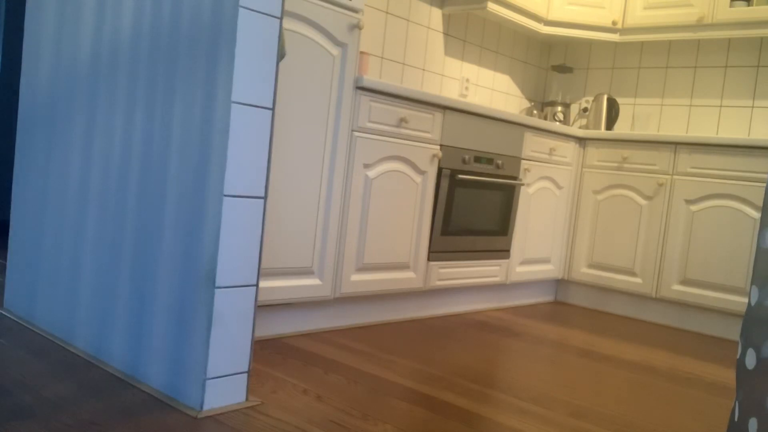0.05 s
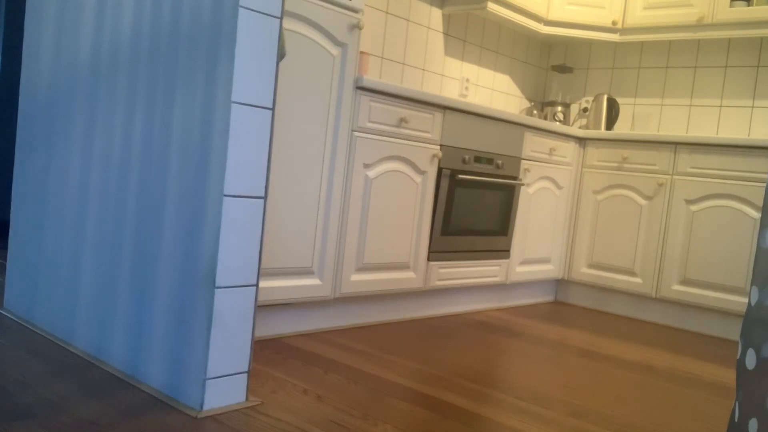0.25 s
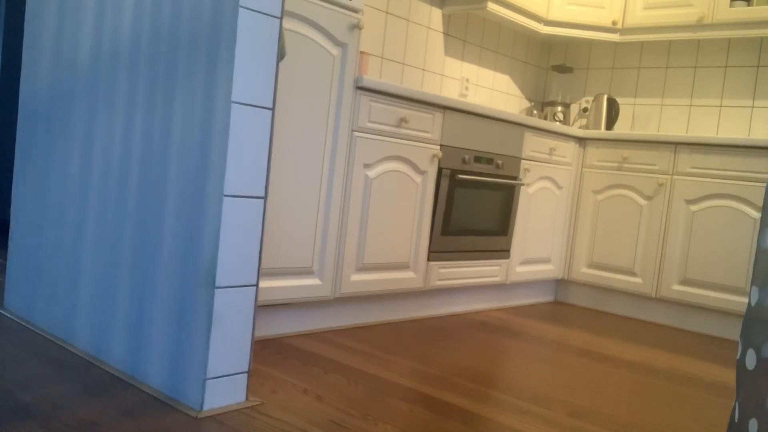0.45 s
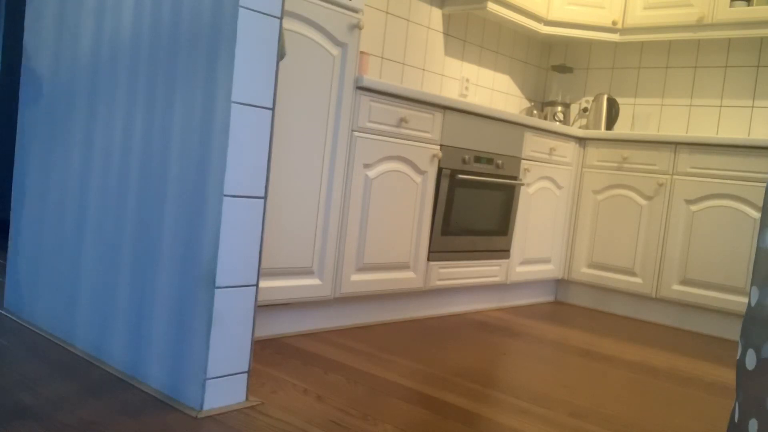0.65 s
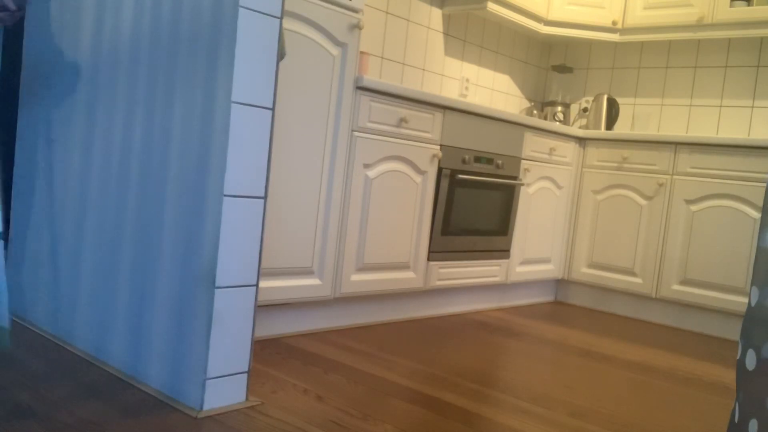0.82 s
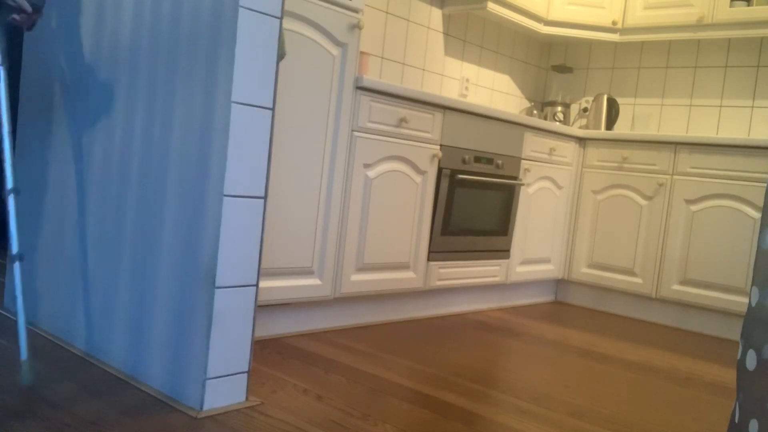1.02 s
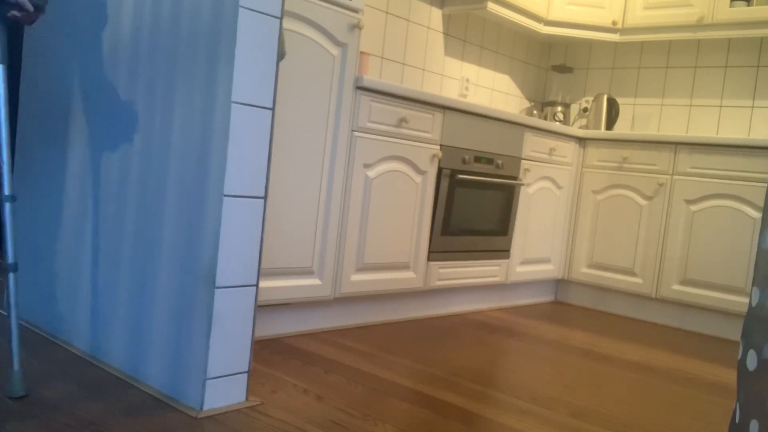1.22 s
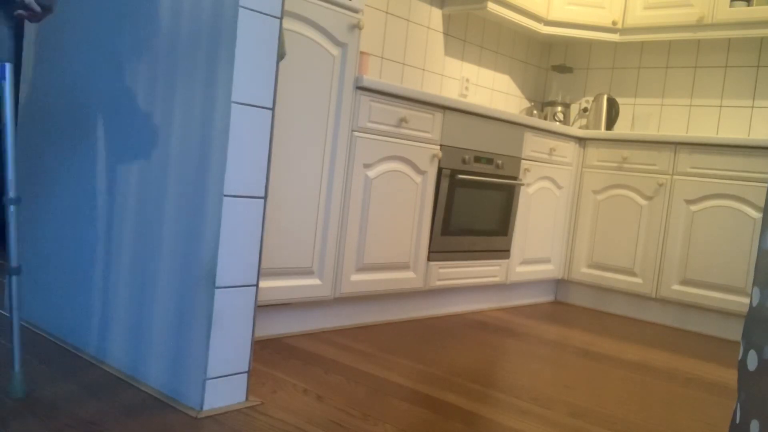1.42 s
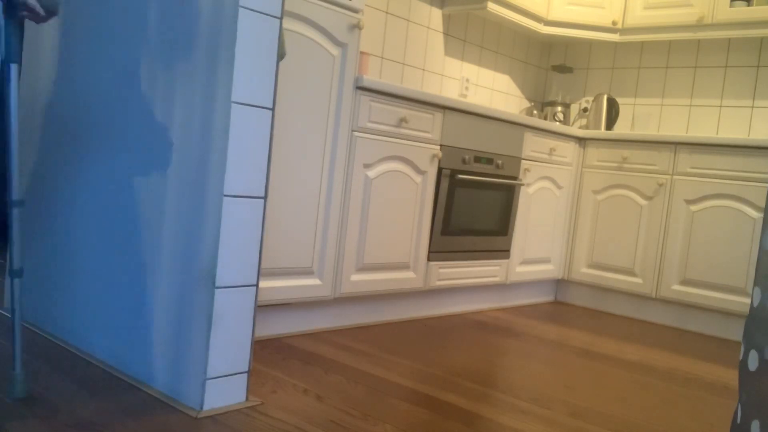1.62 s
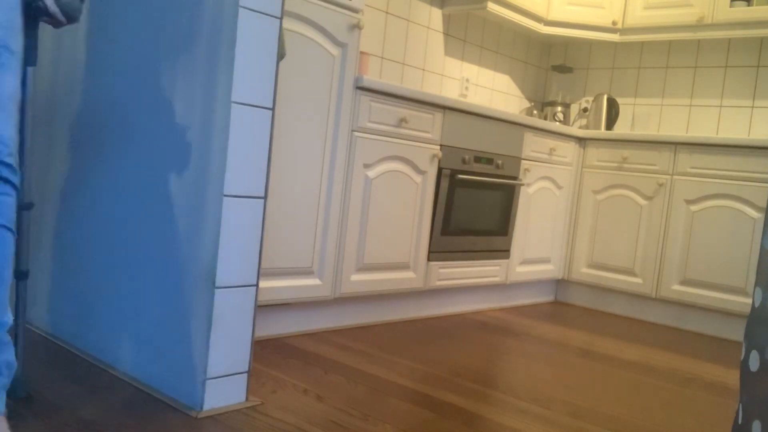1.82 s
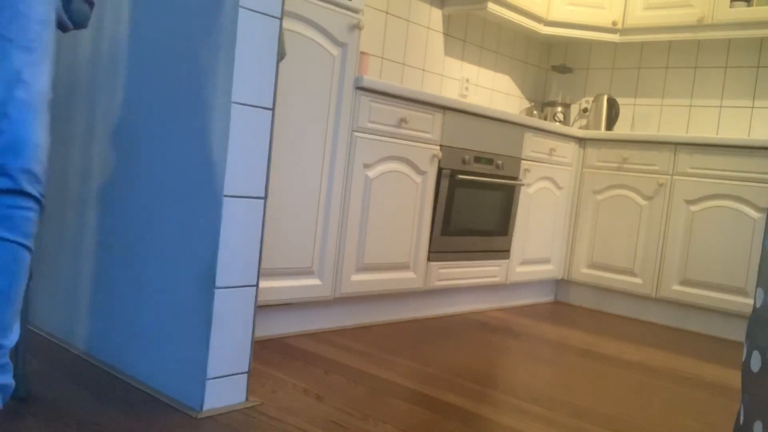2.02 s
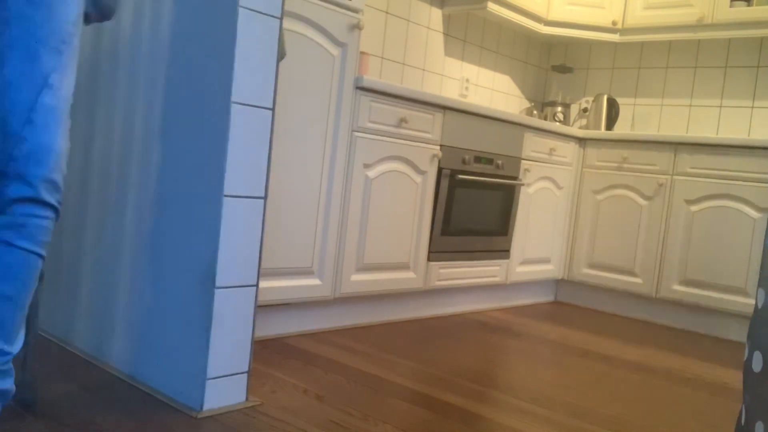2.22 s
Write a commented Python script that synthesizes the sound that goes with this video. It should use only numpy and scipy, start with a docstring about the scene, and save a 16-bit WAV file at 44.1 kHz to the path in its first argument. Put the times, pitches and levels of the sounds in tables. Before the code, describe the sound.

Someone walks on crutches over a hard floor in an echoing kitchen, a few metres away. A scuff and heavy thud come around 0.3 seconds, followed by light metal clacks. Just after 1 second the loudest clacks sound and the floor booms. From 1.7 to 2 seconds rubber tips and a shoe thud and scuff again, with one last clack near 2.2 seconds. A faint low hum continues throughout.

```python
"""Someone on crutches takes two swinging steps over a hard floor into an echoing kitchen.
First an earlier step's echo fades over a low hum that never stops. A scuff and a heavy thud follow,
as rubber tips and a shoe meet the floor, then the loose metal tubes clack. After one second come the
loudest clacks, and the floor booms under the weight. More thuds and scuffs lead to one last clack.
A small stereo microphone hears it all from a few metres away."""
import sys
import numpy as np
from scipy import signal
from scipy.fft import rfft, irfft
from scipy.io import wavfile

SR = 44100
rng = np.random.default_rng(int(sys.argv[2]) if len(sys.argv) > 2 else 0)


def wav_record(signal):
    """Record a signal, one row per channel, as 16-bit PCM in the file named by sys.argv[1]."""
    frames = np.transpose(np.atleast_2d(signal))
    bounded = np.clip(frames, -1, 1)
    # unit amplitude maps onto the largest positive 16-bit level
    quanta = np.round(bounded * 32767).astype(np.int16)
    wavfile.write(sys.argv[1], SR, quanta)


N = 103635
t = np.arange(N) / SR
freq = np.maximum(np.arange(N + 1) * SR / (2 * N), 1)
LEFT_RIGHT = np.array([[1], [-1]])  # plus on the left, minus on the right


def amp(db):
    """Turn decibels into a gain."""
    return 10 ** (np.asarray(db) / 20)


def blow(x):
    """Scale a hit to the energy of 12 ms at level one."""
    return x * np.sqrt(.012 * SR / np.sum(x ** 2))


def through(x, response):
    """Filter a sound with one gain for each frequency."""
    return irfft(rfft(x, 2 * N) * response)[..., :N]


def colour(points):
    """Join points of pitch in Hz and level in dB into a gain for each frequency."""
    hz, db = np.array(points).T
    return amp(np.interp(np.log(freq), np.log(hz), db))


def noise(points):
    """Noise at level one, coloured by such points."""
    x = through(rng.standard_normal(N), colour(points))
    return x / x.std()


def tilt(x, tilt_db):
    """Brighten or dull a sound above 1000 Hz by so many dB per octave."""
    return through(x, amp(tilt_db * np.log2(np.maximum(freq / 1000, 1))))


def band(hz, width):
    """A filter that favours one pitch; its width is a share of that pitch."""
    return 1 / (1 + 1j * (freq / hz - hz / freq) / width)


def fade(t60, rise=1 / SR):
    """Swell, then die away. The fade time t60 is the seconds it takes to fall 60 dB."""
    return amp(-60 * t / t60) * (1 - np.exp(-t / rise))


def add(track, x, at):
    """Mix a sound into a track at a time in seconds."""
    i = int(max(at, 0) * SR)
    track[..., i:] += x[..., :N - i]


def send(x, room_db):
    """Split a sound into its direct part and the part that fills the room."""
    return np.array([x, x * amp(room_db)])


def strike(notes, rise):
    """Set an object's notes ringing, each from a random point in its wave."""
    rings = np.array([amp(db) * fade(t60, rise) * np.exp(2j * np.pi * hz * t) for hz, db, t60 in notes])
    phases = np.exp(2j * np.pi * rng.random(len(notes)))
    return blow((phases @ rings).imag)


def background():
    """Still room air and the wavering hum of an appliance."""
    # The air's colour. Each row: pitch in Hz, level in dB.
    air_colour = [(20, -1), (42, 0), (70, -7), (130, -16.5), (300, -22.5), (1000, -29.5), (3000, -35.5),
                  (8000, -41), (16000, -48)]
    air_db, hum_db, hum_hz = -64.5, -64, 101.5
    waver = 1 + 0.25 * noise([(1, 0), (5, 0), (15, -30), (60, -100)])
    hum = amp(hum_db) * np.sqrt(2) * waver * np.sin(2 * np.pi * hum_hz * t)
    air = noise(air_colour) + 0.5 * noise(air_colour) * LEFT_RIGHT
    return hum + amp(air_db) * air


def earlier_step():
    """The dull echo of an earlier step dies away at the start."""
    # The echo's colour. Each row: pitch in Hz, level in dB.
    echo_colour = [(80, 6), (250, 0.5), (500, -8.5), (1500, -15), (4000, -22.5), (12000, -41)]
    return amp(-63.5) * fade(t60=0.34) * noise(echo_colour)


def kitchen(x):
    """Dense echoes off tiles and cupboards; each range of pitch fades at its own speed."""
    # The room's echo. Each row: pitch in Hz, fade time in seconds, level in dB,
    # how much left and right differ from 0 to 1.
    ranges = [(62.7, 0.98, 9.5, 0), (145, 0.75, 7, .3), (382, 0.58, 2.5, 0.2), (635, 0.63, 3, 0.98),
              (1400, 0.63, 4.5, 1), (3240, 0.61, 5, 0.98), (6000, 0.5, 0.5, 1), (8000, 0.41, 2, 0.1),
              (15000, 0.58, -6, .25)]
    centres = np.log([row[0] for row in ranges])
    mid, side = rfft(rng.standard_normal((2, N)), 2 * N)
    echo = np.zeros((2, N))
    for this_range, (hz, t60, db, apart) in zip(np.eye(len(ranges)), ranges):
        share = np.interp(np.log(freq), centres, this_range)
        tail = fade(t60, rise=0.00057)
        pair = irfft(share * (mid + apart * side * LEFT_RIGHT))[:, :N] / np.hypot(1, apart)
        add(echo, amp(db) * pair * tail / np.linalg.norm(tail), at=.004)
    return through(x, rfft(echo, 2 * N))


def floor_lows():
    """The floor booms on its low notes and rumbles under the walker's weight."""
    # Booms. Each row: start in seconds, level in dB, pitch in Hz, fade time in seconds.
    booms = [(1.039, -39, 112, 0.24), (1.131, -36, 172, 0.71), (2.124, -58, 172.8, 1)]
    # Weight rolling onto the floor. Each row: start in seconds, level in dB.
    loads = [(.39, -45), (1.04, -45.5), (1.771, -55), (2.029, -54)]
    # The rumble's colour. Each row: pitch in Hz, level in dB.
    rumble_colour = [(20, -18), (31, -9), (42, 6), (60, -5), (90, -19), (160, -45.5), (600, -61)]
    out, weight = np.zeros(N), np.zeros(N)
    for at, db, hz, t60 in booms:
        boom = fade(t60, rise=0.016)
        add(out, amp(db) * np.sqrt(2) * boom / boom.max() * np.sin(2 * np.pi * hz * t), at)
    load = fade(t60=0.51, rise=0.052)
    for at, db in loads:
        add(weight, amp(db) * load / load.max(), at)
    return out + weight * noise(rumble_colour)


def scuffs():
    """A sole or tip slides briefly, swelling until it grips."""
    # Slides. Each row: moment of grip in seconds, level in dB, rise and fall in seconds,
    # brightness in dB per octave, room share in dB.
    slides = [(.241, -52, 0.022, 0.018, -11, -4), (1.745, -56.5, 0.04, 0.05, -1.5, -3.5),
              (1.858, -48.5, 0.057, 0.028, 0, -4), (2.183, -65.5, 0.03, 0.029, -2, -8.5)]
    # The rubbing's colour. Each row: pitch in Hz, level in dB.
    rub_colour = [(200, 0.5), (600, 13.5), (1500, 11), (3500, 4), (6400, 4.5), (7500, 2), (9000, -1),
                  (15500, -4.5)]
    out, rub = np.zeros((2, N)), noise(rub_colour)
    for at, db, rise, fall, tilt_db, room_db in slides:
        swell = np.exp(-((t - at) / np.where(t < at, rise, fall)) ** 2)
        slide = tilt(rub, tilt_db)
        out += send(amp(db) * swell * slide / slide.std(), room_db)
    return out


def thuds():
    """A rubber tip or shoe ticks at first touch, then pushes the floor and makes it ring."""
    # Landings. Each row: start in seconds, level in dB, pitch in Hz, width as a share of the pitch,
    # then the shares of bass, tick and room in dB.
    landings = [(0.2388, -34.5, 388, 0.65, -6.5, -18, 1), (.3450, -20.5, 735, 0.81, -14.5, -14.5, -5),
                (0.3479, -26.5, 431, 0.4, -9.5, -50, 1), (1.02, -36.5, 442, 0.63, -18, -21.5, 3.5),
                (1.038, -39, 236, 2.1, -1, -31, 0), (1.13, -44, 284, 0.66, 8, -42.5, -4),
                (1.463, -59.5, 573, 1.83, -4, -2, -1), (1.7081, -37.5, 435, 0.64, -35, -17, -1.5),
                (1.7228, -37.5, 429, 0.51, -22, -22.5, -4.5), (1.810, -39.5, 412, 0.91, -26, -22, 1.5),
                (1.830, -39.5, 374, 0.73, -36, -30, -7.5), (1.9807, -23.5, 396, 0.86, -13.5, -24.5, -5.5),
                (2.004, -34.5, 448, 0.5, -7.5, -25, -10), (2.0204, -37, 473, 0.46, -14, -20, -10.5),
                (2.1287, -49, 515, 0.84, -26.5, -11, -8)]
    # The tick's colour. Each row: pitch in Hz, level in dB.
    tick_colour = [(500, -6.5), (1100, 6), (1800, 10), (2800, -3.5), (4000, -4.5), (5500, -17.5),
                   (8000, -36.5), (16000, -44.5)]
    # The floor's own notes. Each row: pitch in Hz, level in dB, fade time in seconds.
    floor_notes = [(227, -10, 0.54), (300.6, -13, 0.13), (360.2, -10, 0.07), (445.4, -11.5, 0.097),
                   (620, -6.5, 0.046), (689, -15.5, 0.41), (835, -19.5, 0.39), (926, -16.5, 0.25),
                   (1038, -14.5, 0.077)]
    softness, squash_s = 2.73, .0012  # rubber mutes above this multiple of the pitch, and pushes late
    out, grit = np.zeros((2, N)), noise(tick_colour)
    floor = 1
    for hz, db, t60 in floor_notes:
        width = np.log(1000) / np.pi / t60 / hz  # a longer ring is a narrower note
        floor += amp(db) * np.sqrt(t60 * hz) * band(hz, width) / 2
    floor *= 1 - 0.62 * band(hz=770, width=0.52)  # a dead spot between the notes
    bass = blow(irfft(band(hz=156.4, width=0.97) ** 2)[:N])
    for at, db, hz, width, bass_db, tick_db, room_db in landings:
        rubber = np.exp(-(freq / hz / softness) ** 2 - 2j * np.pi * freq * squash_s)
        push = blow(irfft(band(hz, width) ** 2 * floor * rubber)[:N])
        tick = blow(np.roll(grit, rng.integers(N)) * fade(t60=0.023))
        thud = amp(tick_db) * tick - push - amp(bass_db) * bass
        add(out, send(amp(db) * thud, room_db), at)
    return out


def clacks():
    """As a crutch is loaded or lifted, loose metal chatters, rings the tube and knocks the grip."""
    # Clacks. Each row: start in seconds, level in dB, the shares of tube, grip and room in dB,
    # brightness in dB per octave.
    hits = [(0.4536, -40.5, -6, -21, 1.5, 8), (0.4559, -42.5, -20, 0.5, 1, -3),
            (0.5823, -45, -3.5, -9, 0.5, -1.5), (0.5851, -48, 2.5, 4.5, -46, -17.5),
            (0.7841, -74, -10.5, -21, -11.5, 0), (0.83, -65.5, -14.5, -9.5, -12.5, -0.5),
            (0.985, -72.5, -10, -20.5, -10, -0.5), (1.032, -54, -3.5, 14, -8, 4),
            (1.0383, -27, -12.5, -2, -1.5, 9), (1.130, -34, 1.5, 1, 1, 0.5),
            (1.1321, -28, -13, -2, -20.5, 1.5), (1.395, -53, -19.5, -10, -6.5, -1.5),
            (1.484, -58.5, -23, -3.5, -6.5, -8), (2.1871, -48, -3, -11, 2, 1)]
    # The colours of the metal's crack and the grip's knock. Each row: pitch in Hz, level in dB.
    crack_colour = [(500, 6.5), (1500, -9.5), (3200, -0.5), (4700, 4), (6300, 2.5), (7300, 8), (8300, 3),
                    (11000, 1), (15400, -5.5), (17000, -23)]
    knock_colour = [(100, -34.5), (300, -7), (750, 0), (1150, 5), (2000, 1.5), (4000, -10), (9000, -32.5)]
    # The notes of the tube and of the grip and cuff. Each row: pitch in Hz, level in dB,
    # fade time in seconds.
    tube_notes = [(3210, -14, 0.0068), (6100, -2.5, 0.013), (6494, -3.5, 0.025), (8215, -0.5, 0.033),
                  (8510, 5, 0.0068), (11000, -10.5, 0.0064), (15650, -13, 0.017)]
    grip_notes = [(1059, 0.5, .04), (1652, -5.5, 0.068), (1788, -9, .09), (2180, -4, 0.12), (2556, -3, .03)]
    rise_s, spread_s, grip_ring_db = 0.00079, .002, -7
    out, bright, dull = np.zeros((2, N)), noise(crack_colour), noise(knock_colour)
    chatter = np.exp(0.18 * np.repeat(rng.standard_normal(N), 16)[:N])  # a new level every 16 samples
    # The room gets each clack a little later and from all sides, so with a smooth colour.
    delay = np.exp(-2j * np.pi * freq * spread_s)
    smooth_crack = blow(irfft(colour(crack_colour) * delay)[:N])
    smooth_knock = blow(irfft(colour(knock_colour) * delay)[:N])
    for at, db, tube_db, grip_db, room_db, tilt_db in hits:
        shift = rng.integers(N)
        crack = blow(np.roll(tilt(bright, tilt_db) * chatter, shift) * fade(t60=0.035, rise=rise_s))
        knock = blow(np.roll(dull, shift) * fade(t60=0.027, rise=rise_s))
        ring = amp(tube_db) * strike(tube_notes, rise_s)
        ring += amp(grip_db + grip_ring_db) * strike(grip_notes, rise_s)
        direct = crack + ring + amp(grip_db) * knock
        around = blow(tilt(smooth_crack, tilt_db)) + 0.43 * ring + 0.56 * amp(grip_db) * smooth_knock
        add(out, amp(db) * np.array([direct, amp(room_db) * around]), at)
    return out


def scene():
    """Mix the steps, their first echoes, the kitchen's long echo and the quiet room."""
    # First echoes off the wall and ceiling. Each row: delay in seconds, level in dB.
    first_echoes = [(.0092, -21), (0.014, -18), (0.0255, -21)]
    balance_db = -1.4  # left minus right
    direct, to_room = thuds() + clacks() + scuffs()
    for delay, db in first_echoes:
        add(direct, amp(db) * to_room, delay)
    steps = (direct + kitchen(to_room) + floor_lows()) * amp(balance_db * LEFT_RIGHT / 2)
    return steps + background() + earlier_step()


def record(dry):
    """The microphone widens the sound by shifting the two sides' waves, and cuts the highest treble."""
    turn_hz, lag_s, top_hz = 880, .000415, 16000
    turn = 1j * freq / turn_hz
    left = (1 - turn) / (1 + turn)  # shifts each pitch's wave but keeps its level
    right = np.exp(-2j * np.pi * freq * lag_s)  # a plain delay
    wide = through(dry, np.array([left, right]))
    return signal.sosfilt(signal.ellip(8, .2, 70, top_hz, fs=SR, output="sos"), wide)


dry = scene()
out = record(dry)
wav_record(out)
```